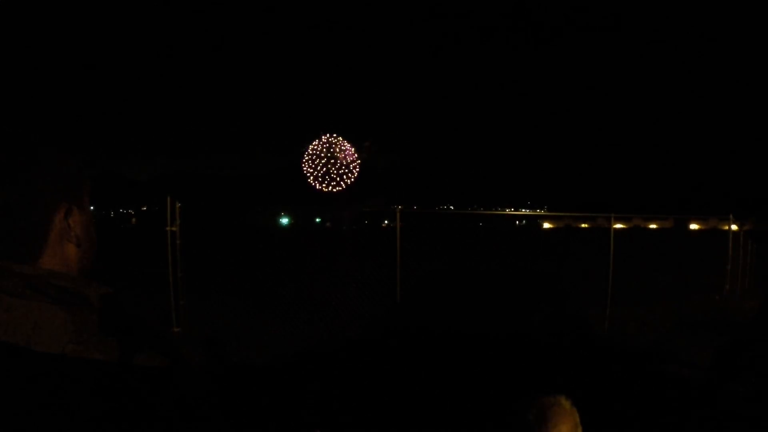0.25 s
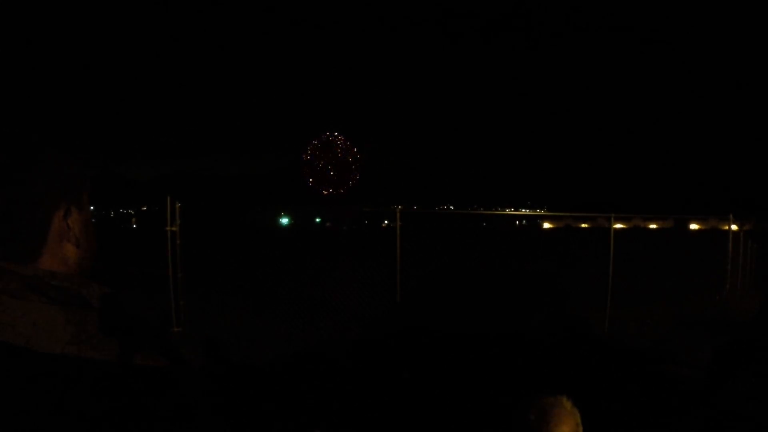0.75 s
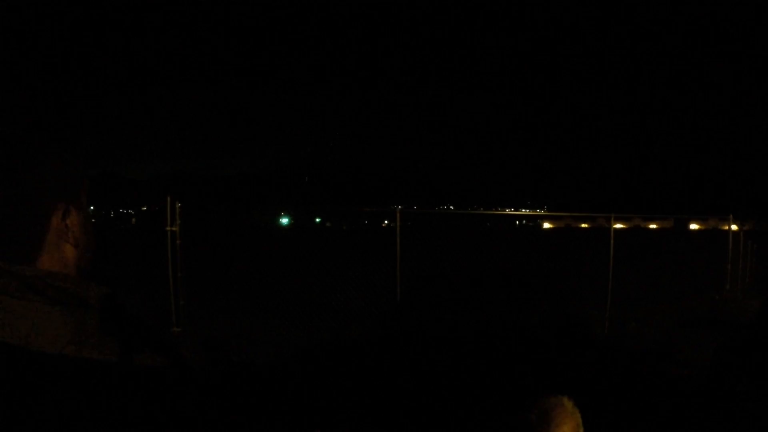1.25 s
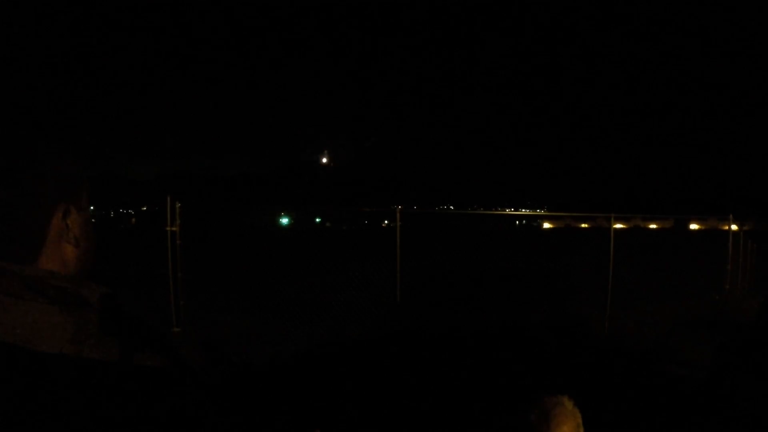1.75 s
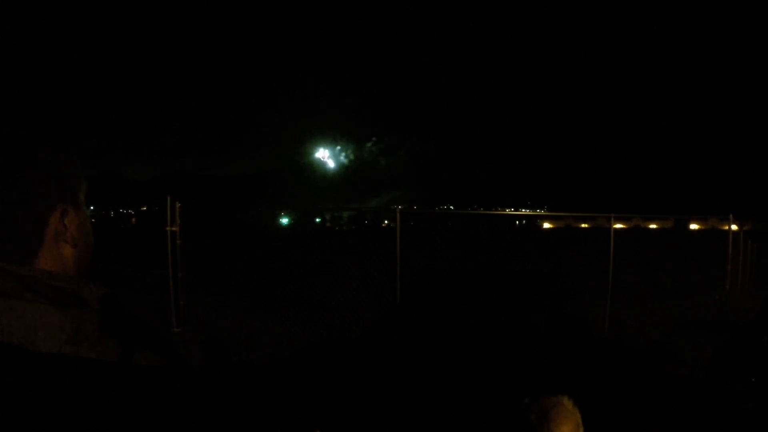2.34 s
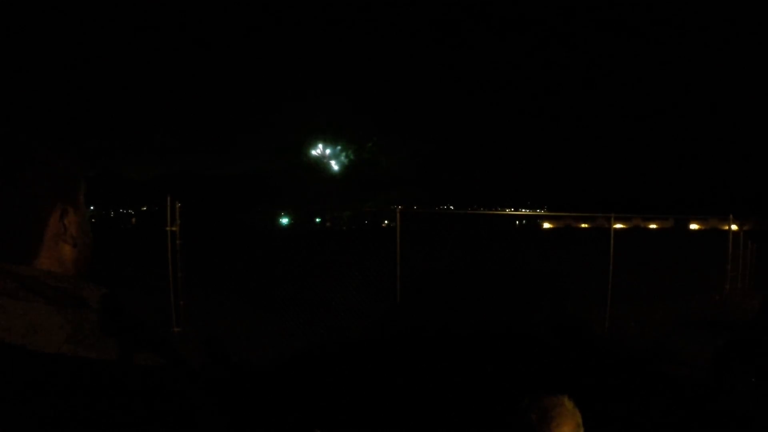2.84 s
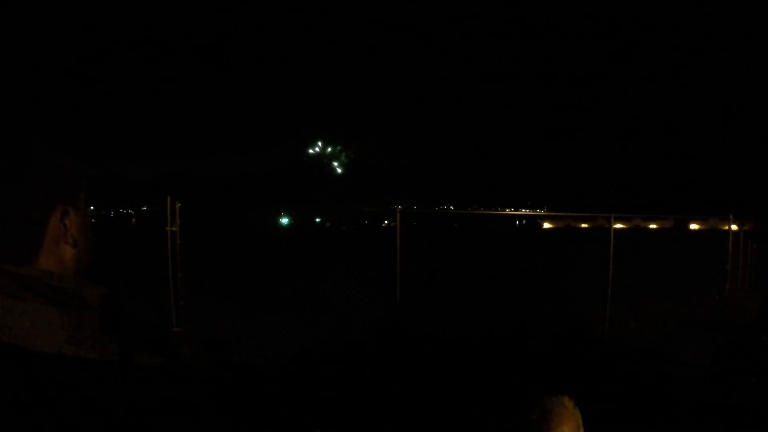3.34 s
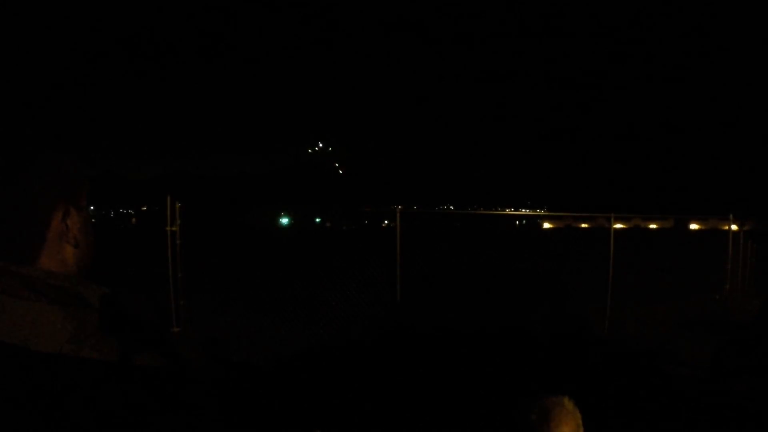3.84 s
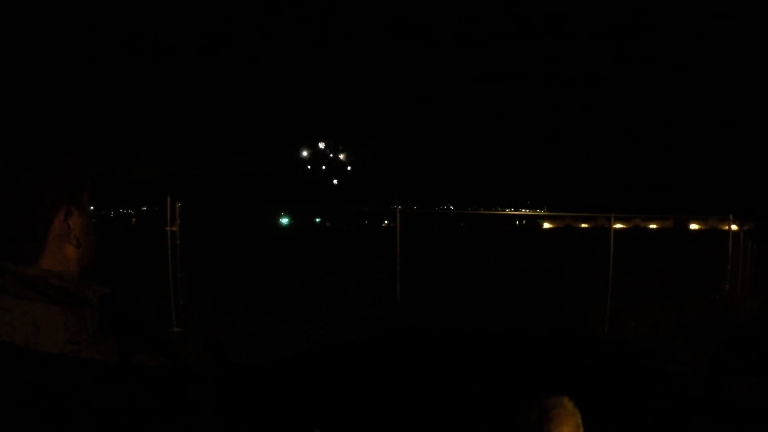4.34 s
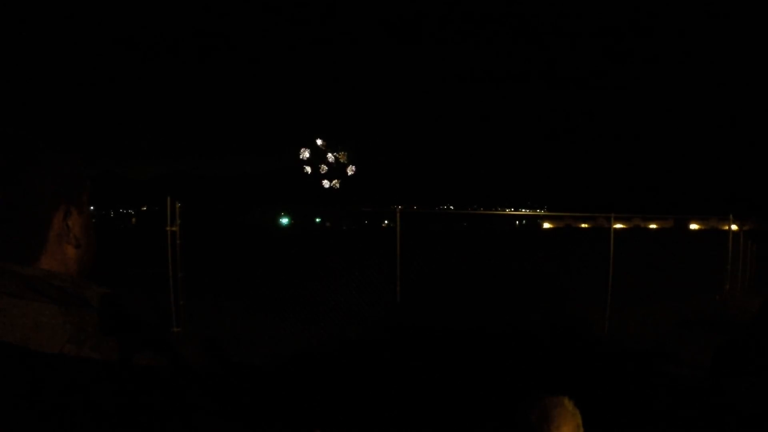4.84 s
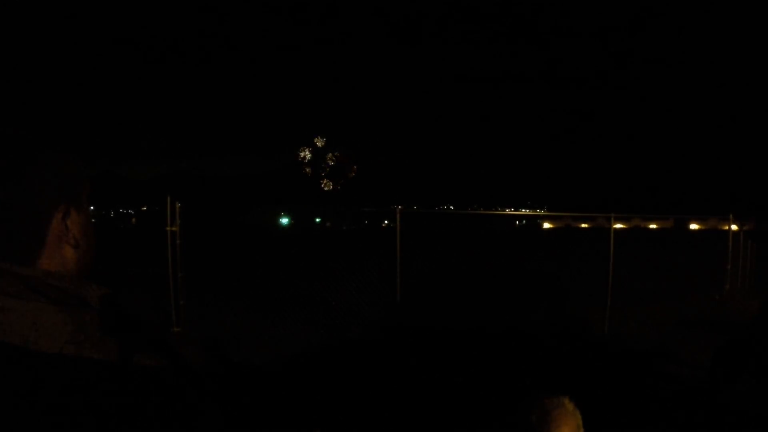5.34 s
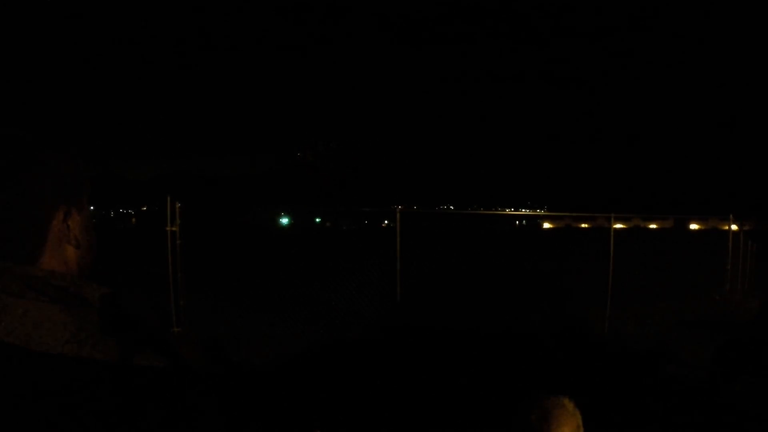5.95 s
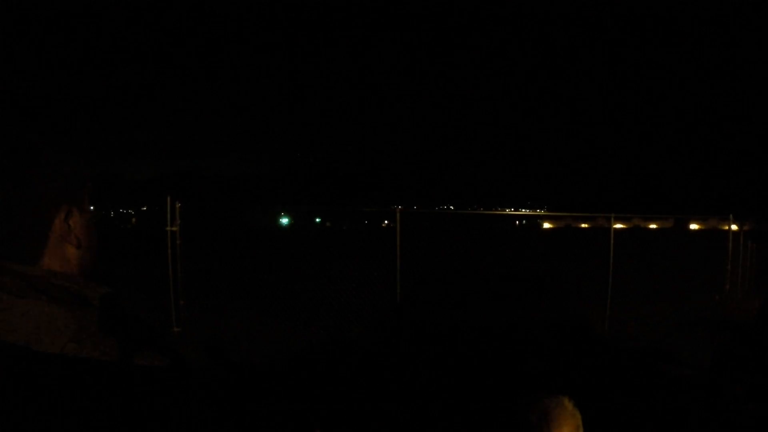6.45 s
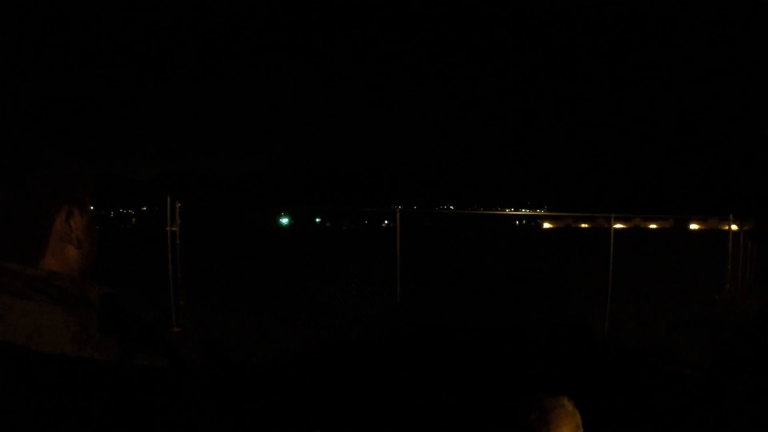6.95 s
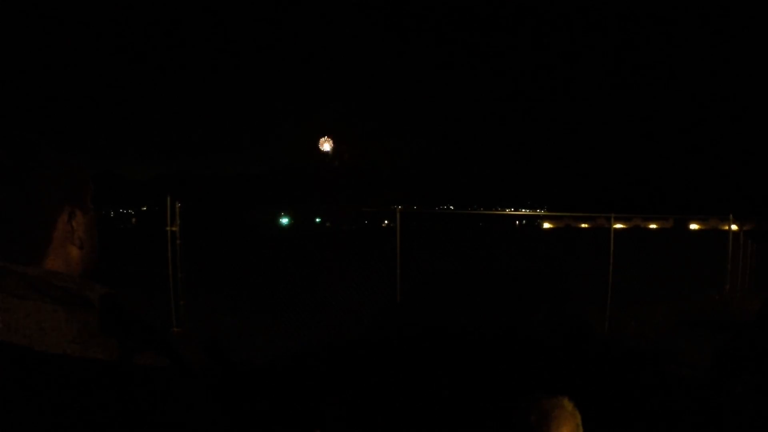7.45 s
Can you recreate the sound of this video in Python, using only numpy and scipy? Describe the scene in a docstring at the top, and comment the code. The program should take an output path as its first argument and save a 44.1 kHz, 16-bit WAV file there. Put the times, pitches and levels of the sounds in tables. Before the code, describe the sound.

Fireworks go off far away over a town at night. A shell bursts with a sharp crack and deep boom, followed quickly by a quieter mortar thud, and echoes roll away. After a lull, a second loud burst brings a brief crackle of echoes, then another softer thud and a few small pops. The distant microphone also picks up a faint low town rumble and steady hiss.

```python
"""Distant fireworks at night.

Shells burst aloft and mortars thud on the ground. Each blast arrives as a push-and-pull pressure wave
with a sharp crack and excites the modes of a nearby hollow. The town returns it as discrete echoes off
walls and as a diffuse rumble. Beneath lie the far town's noise, a camera's steady hiss and thin pulsed
whine, and one faint rustle close by."""
import sys
import numpy as np
from scipy import signal
from scipy.fft import rfft, irfft
from scipy.io import wavfile
from scipy.ndimage import uniform_filter1d

SR = 44100
rng = np.random.default_rng(int(sys.argv[2]) if len(sys.argv) > 2 else 0)


def unload_wav(signal):
    """Save mono or channel-first audio to the path in sys.argv[1] as 16-bit WAV at rate SR, clipped to [-1, 1]."""
    wavfile.write(
        sys.argv[1],
        SR,
        np.round(np.clip(np.atleast_2d(signal).T, -1, 1) * 32767).astype(np.int16),
    )


N = 339119

# Spectrum of town noise and hiss: (frequency [Hz], relative density [dB])
NIGHT_SPECTRUM = [(12, -34), (20, -2.5), (49, 0.5), (82, -0.5), (109, -0.5), (279, -7.5), (320, -8),
                  (658, -13), (715, -13.5), (4580, -27), (9420, -36.5), (10500, -37), (15100, -44.5)]
# Shell bursts: (time [s], crack [dB], thump [dB], wave duration [ms], deep mode [dB],
#   bright scatter [dB], low scatter [dB], scatter T60 [s], tilt [dB/octave], treble edge [Hz],
#   housing ring [dB], treble sent to the walls [dB])
SHELL_BURSTS = [(1.8134, -9.5, -17, 9.4, -17, -25.5, -30, .052, -1.5, 6470, -16, -31.5),
                (5.2184, -9, -16, 10.5, -17, -23.5, -35.5, 0.068, 0.5, 6500, -16, -23),
                (7.393, -46, -41.5, 5.4, -19, -46.5, -50, 0.062, -8.5, 3400, -2, -50),
                (7.6148, -38, -33.5, 3.1, -17, -40.5, -51, 0.04, 0.5, 3800, -4, -43),
                (7.635, -33.5, -30, 2.27, -24, -41.5, -37.5, 0.044, -2.5, 4780, -8, -43)]
# Mortar launches: columns as in SHELL_BURSTS
MORTAR_LAUNCHES = [(2.1595, -19, -25, 5.38, -13, -34, -42, 0.068, -3.5, 4800, 4.5, -34.5),
                   (6.5402, -28.5, -24.5, 4.8, -15, -38.5, -41, 0.047, -2.5, 4730, -2, -34.5)]
# Modes of the nearby hollow: (frequency [Hz], gain [dB], T60 [s])
HOLLOW_MODES = [(104.7, -14, 0.2), (144.6, -27.5, 0.29), (197, -26.5, 0.16), (252.4, -15.5, 0.074),
                (335, -29.5, 0.12), (438, -30, 0.106)]
# Paths of the front through layered air: (delay [s], gain [dB])
FRONT_PATHS = [(.0004, -6), (.00072, 0), (.001, 2.5)]
# Microphone port resonances, rung by the front: (frequency [Hz], bandwidth [Hz], gain [dB])
PORT_MODES = [(1390, 730, -4.5), (2854, 485, -3), (4760, 820, -8.5), (6500, 2200, -42)]
# Housing resonances, driven by diffuse sound: (frequency [Hz], bandwidth [Hz], gain [dB])
HOUSING_MODES = [(980, 1160, -10.5), (1601, 130, 7), (2435, 380, 2), (3480, 520, -4.5), (4360, 370, -6),
                 (6260, 2300, -15)]
# Wall reflections of a burst: (delay [s], crack [dB], bright scatter [dB], thump [dB], low scatter [dB],
#   scatter rise [ms], scatter T60 [s], wave duration [ms], tilt [dB/octave])
# The first two levels are relative to the treble sent, the other two to the blast's thump.
BURST_ECHOES = [(0.0896, -29, -19, -27, -41, 2.3, 0.049, 8.4, 3),
                (.118, -19, -18, -25, -51, .6, 0.045, 7, 10),
                (.189, -12, -11.5, -25, -42, 0.46, 0.033, 6.7, 9),
                (.257, -35, -28, -39, -41, .6, .05, 6, 8), (.3466, -27, -19.5, -22, -48, .6, .088, 6.4, 4),
                (.545, -19, -21, -33, -38, .6, 0.033, 4.9, 1.5),
                (0.739, -35, -29.5, -23.5, -42, 3.2, 0.1, 9.2, -8)]
# The same for a launch; the negative delay is a hiss that swells into the thud
LAUNCH_ECHOES = [(-.0085, -20, 2.5, -26, -24, 6.6, 0.077, 3.6, -3.5),
                 (.271, -20, -10, -22, -30.5, 2.5, 0.058, 4, -12),
                 (.344, -13, -13.5, -23, -27.5, 2.5, .1, 6, -2)]
# Single slaps after the bursts:
#   (time [s], crack [dB], bright scatter [dB], scatter T60 [s], tilt [dB/octave], treble edge [Hz])
LONE_SLAPS = [(1.873, -51, -45.5, 0.072, -7, 4500), (5.3625, -35, -45, .04, 1, 3770),
              (5.5, -45, -39.5, 0.033, 4, 3800), (5.5497, -41, -47.5, 0.11, 6, 5930),
              (5.588, -46, -48, 0.078, 5, 5450), (5.601, -42, -48.5, 0.11, 1, 5470)]
# Diffuse decay of each kind of blast: (delay [s], rumble re thump [dB], clatter re bright scatter [dB])
BURST_DECAY = [(0.019, -26.5, -31), (.09, -23.5, -30), (.135, -31, -32), (.18, -32.5, -34),
               (.23, -39.5, -39), (.45, -32.5, -38), (.56, -50, -47), (.78, -33, -41), (.95, -40, -48),
               (1.15, -40.5, -47), (1.6, -50, -49)]
LAUNCH_DECAY = [(.03, -16, -25), (.1, -29, -31), (.22, -37, -33), (.66, -44, -38), (1.0, -49, -38.5)]
# Spectral peaks of the rumble: (frequency [Hz], bandwidth [Hz], gain [dB])
RUMBLE_BANDS = [(43.4, 44, -9), (64.7, 21, 2.5), (105.3, 19, 1), (164, 80, -5.5), (290, 172, -15.5),
                (550, 240, -23)]


def undb(db):
    """Amplitude ratio of a level in decibels."""
    return 10 ** (np.asarray(db) / 20)


def unit_rms(x):
    """Normalisation to an rms of 1."""
    return x / np.sqrt(np.mean(x ** 2))


def band(x, hz, width):
    """Two-pole resonance with unit gain at its centre."""
    return signal.lfilter(*signal.iirpeak(hz, hz / width, SR), x)


def resonate(x, modes, tilt_db=0):
    """Superposition of modes with alternating signs, tilted by tilt_db per octave about 2 kHz."""
    return sum((-1) ** k * undb(db + tilt_db * np.log2(hz / 2000)) * band(x, hz, width)
               for k, (hz, width, db) in enumerate(modes))


def air_absorption(x, top_hz):
    """Atmospheric absorption: a long path acts as a low-pass filter."""
    return signal.sosfilt(signal.butter(6, top_hz, fs=SR, output="sos"), x)


def night_noise():
    """Coloured noise of the far town and the microphone; the bass swells a little."""
    hz, db = np.transpose(NIGHT_SPECTRUM)
    freqs = np.fft.rfftfreq(N, 1 / SR) + 1
    colour = undb(np.interp(np.log(freqs), np.log(hz), db))
    hiss = unit_rms(irfft(rfft(rng.standard_normal(N)) * colour, N))
    bass_swell = (undb(fluctuation(3)) - 1) * band(hiss, 90, 180)
    return undb(-55.5) * (hiss + bass_swell)


def fluctuation(rate_hz):
    """Slow random modulation: held values, smoothed twice, with a spread near 1."""
    hold = int(SR / rate_hz)
    steps = np.repeat(rng.standard_normal(N // hold + 1), hold)
    return 1.3 * uniform_filter1d(uniform_filter1d(steps, hold), hold)[:N]


def sensor_whine(tone_hz=10657, frame_hz=24000 / 1001, onset_s=.0274, on_s=.0196):
    """Periodic gating: the sensor's readout emits the same tone burst once a frame."""
    since_onset = (np.arange(N) / SR - onset_s) % (1 / frame_hz)
    gate = uniform_filter1d(1. * (since_onset < on_s), size=30)
    return undb(-72) * gate * np.sin(2 * np.pi * tone_hz * since_onset)


def front_crack(t, tilt_db, top_hz, ring_db):
    """Multipath propagation: the front arrives as pulses that ring the port and housing. Peak 1."""
    front = sum(undb(db) * np.exp(-((t - delay) / .00005) ** 2) for delay, db in FRONT_PATHS)
    crack = air_absorption(resonate(front, PORT_MODES, tilt_db), top_hz)
    crack += undb(-29) * band(front, 9000, 5000)  # a thin top edge that the air spares
    crack += undb(ring_db) * band(front, *HOUSING_MODES[1][:2])  # the housing's sharpest mode
    return crack / np.abs(crack).max()


def pressure_thump(t, wave_ms, deep_db):
    """Forced response: a short compression and a longer rarefaction set the hollow booming."""
    u = t / (wave_ms / 1000)
    push = np.exp(-((u - .11) / .059) ** 2)
    pull = 1.49 * np.exp(-((u - .6) / .22) ** 2)
    wave = pull - push  # the microphone inverts
    deep_mode = (62, deep_db, .22)  # each blast stirs the lowest mode differently
    hollow = sum(undb(db) * hz * np.sin(2 * np.pi * hz * t) * np.exp(-np.log(1000) * t / t60)
                 for hz, db, t60 in HOLLOW_MODES + [deep_mode])
    return wave - signal.fftconvolve(wave, hollow)[:len(t)] * 2 * np.pi / SR


def blast(crack_db, thump_db, wave_ms, deep_db, bright_db, low_db, rise_ms, t60, tilt_db, top_hz, ring_db):
    """One arrival: crack and thump, with ground scattering as exponentially decaying noise."""
    t = np.arange(SR // 3) / SR
    crack = undb(crack_db) * front_crack(t, tilt_db, top_hz, ring_db)
    thump = undb(thump_db) * pressure_thump(t, wave_ms, deep_db)
    noise = rng.standard_normal(len(t))
    fade = (1 - np.exp(-t * 1000 / rise_ms)) * np.exp(-np.log(1000) * t / t60)
    # scattered sound keeps less treble than the direct front
    bright = unit_rms(air_absorption(resonate(noise, HOUSING_MODES, tilt_db), .87 * top_hz)) * fade
    low = unit_rms(band(band(noise, 235, 280), 236, 720)) * fade ** .53  # the lows linger
    return crack + thump + undb(bright_db) * bright + undb(low_db) * low


def blasts_and_echoes(rise_ms=.76, echo_deep_db=-19, echo_top_hz=3660):
    """Reflection: blasts of one kind return off the same walls at the same delays; lone slaps join in."""
    arrivals = []
    for blasts, echoes in ((SHELL_BURSTS, BURST_ECHOES), (MORTAR_LAUNCHES, LAUNCH_ECHOES)):
        for at, crack, thump, wave_ms, deep, bright, low, t60, tilt, top, ring, sent in blasts:
            direct = blast(crack, thump, wave_ms, deep, bright, low, rise_ms, t60, tilt, top, ring)
            arrivals.append((at, direct))
            for delay, snap, hiss, thud, dull, rise, decay, echo_ms, slope in echoes:
                if at + delay < N / SR:
                    echo = blast(sent + snap, thump + thud, echo_ms, echo_deep_db, sent + hiss,
                                 thump + dull, rise, decay, slope, echo_top_hz, ring)
                    arrivals.append((at + delay, echo))
    for at, crack, bright, t60, tilt, top in LONE_SLAPS:
        slap = blast(crack, thump_db=-55, wave_ms=6.3, deep_db=echo_deep_db, bright_db=bright,
                     low_db=-56, rise_ms=rise_ms, t60=t60, tilt_db=tilt, top_hz=top, ring_db=-12)
        arrivals.append((at, slap))
    pressure = np.zeros(N + SR)
    for at, sound in arrivals:
        start = int(at * SR)
        pressure[start:start + len(sound)] += sound
    return pressure[:N]


def diffuse_roll():
    """Reverberation: countless weak echoes add in power to a lumpy rumble and a grainy clatter."""
    t = np.arange(N) / SR
    lumpy = undb(1.3 * fluctuation(28)) * rng.standard_normal(N)
    rumble = air_absorption(unit_rms(resonate(lumpy, RUMBLE_BANDS)), top_hz=2000)
    grainy = undb(1.6 * fluctuation(90)) * rng.standard_normal(N)
    clatter = air_absorption(unit_rms(resonate(grainy, HOUSING_MODES, tilt_db=-.5)), top_hz=4080)
    rumble_power, clatter_power = np.zeros((2, N))
    for blasts, decay in ((SHELL_BURSTS, BURST_DECAY), (MORTAR_LAUNCHES, LAUNCH_DECAY)):
        delays, rumble_db, clatter_db = np.transpose(decay)
        for at, _, thump, _, _, bright, *_ in blasts:
            rumble_power += undb(thump + np.interp(t - at, delays, rumble_db, left=-120, right=-120)) ** 2
            clatter_power += undb(bright + np.interp(t - at, delays, clatter_db, -120, -120)) ** 2
    rumble *= uniform_filter1d(np.sqrt(rumble_power), size=400)
    clatter *= uniform_filter1d(np.sqrt(clatter_power), size=400)
    return rumble + clatter


def rustle(start_s=3.858, gap_s=.0267, grain_s=.0072):
    """Amplitude modulation: two high noise bands sound in nine short, unevenly spaced dry grains."""
    t = np.arange(N) / SR
    grain_times = start_s + gap_s * (np.arange(9) + .54 * rng.standard_normal(9))
    gate = sum(np.exp(-((t - at) / grain_s) ** 2) for at in grain_times)
    noise = rng.standard_normal(N)
    upper = unit_rms(band(band(noise, 12000, 2200), 12000, 2200))
    lower = unit_rms(band(noise, 6900, 1200))
    return gate * (undb(-78) * upper + undb(-71.5) * lower)


def scene():
    """Linear superposition of all sources at one microphone."""
    return (blasts_and_echoes() + diffuse_roll() + night_noise() + rustle() + sensor_whine())[None]


def record(dry):
    """Band limiting: the camera's steep low-pass filter removes the top treble."""
    return signal.sosfilt(signal.ellip(10, .2, 60, 15150, fs=SR, output="sos"), dry)


dry = scene()
out = record(dry)
unload_wav(out)
```